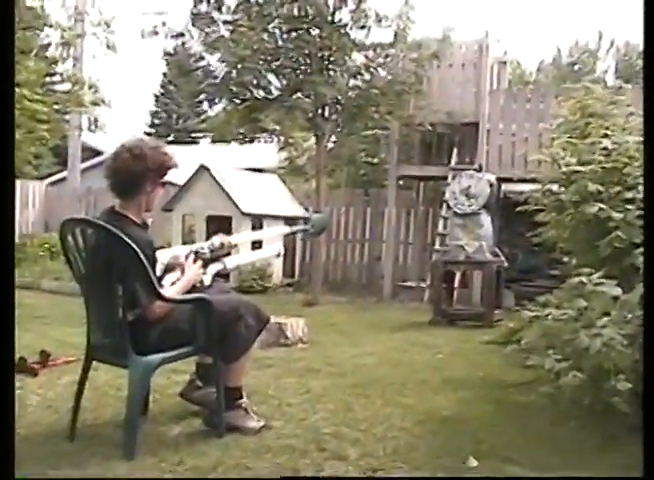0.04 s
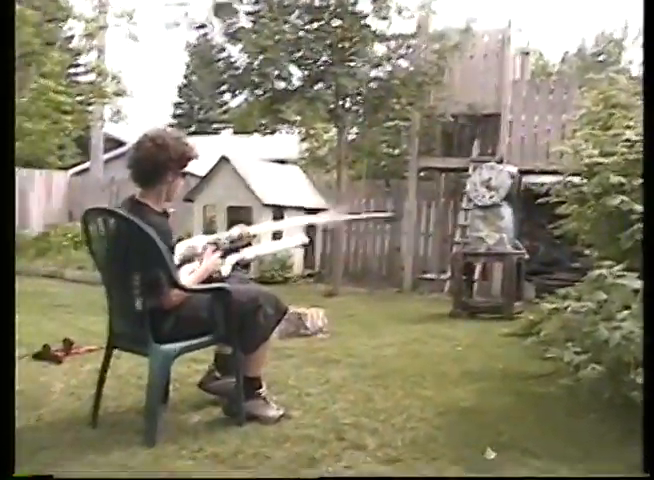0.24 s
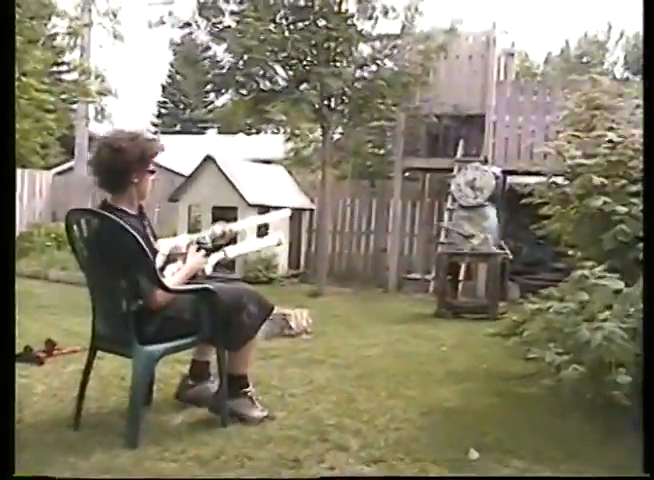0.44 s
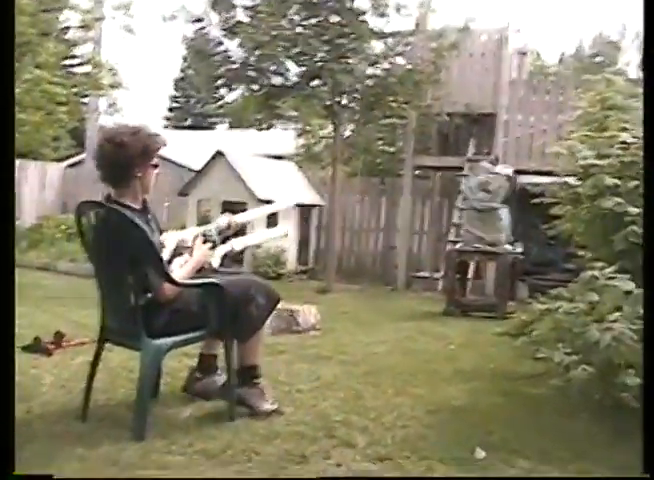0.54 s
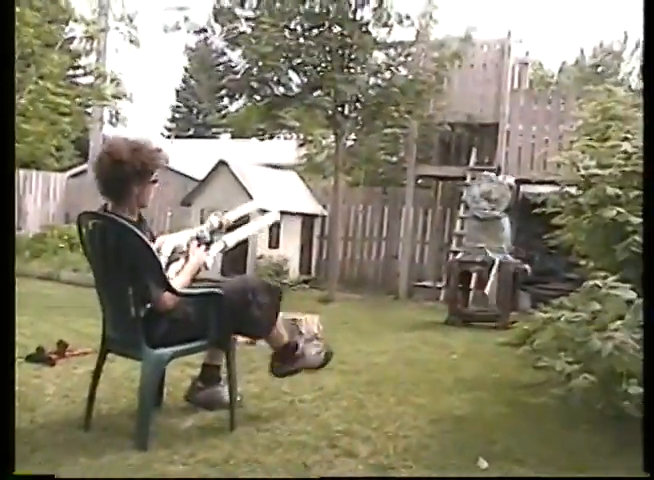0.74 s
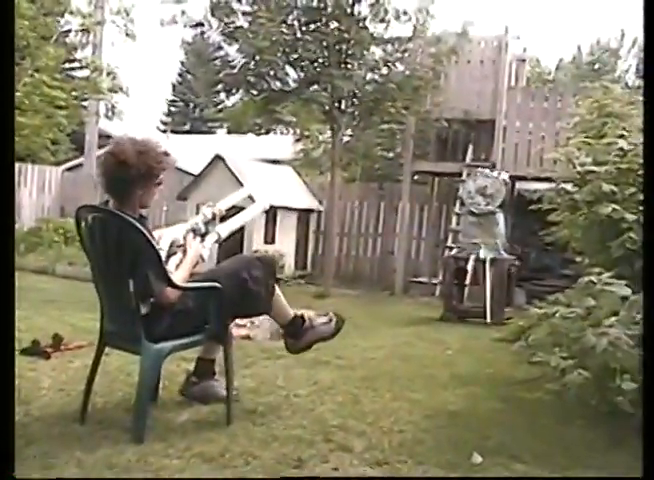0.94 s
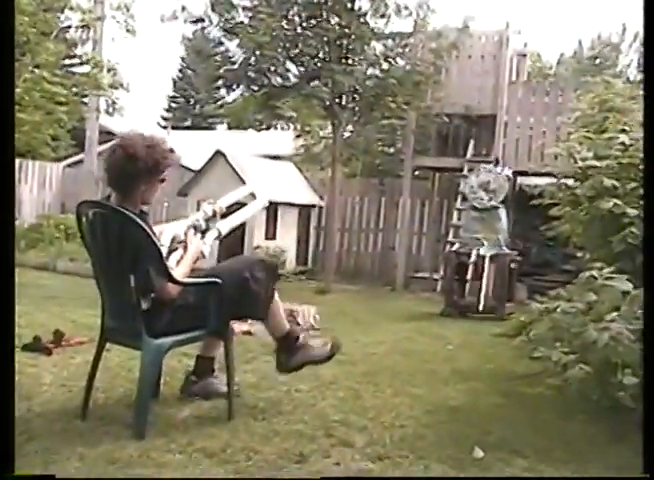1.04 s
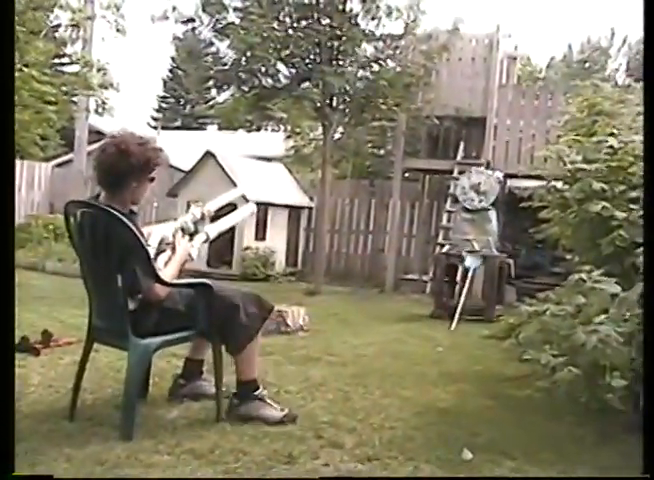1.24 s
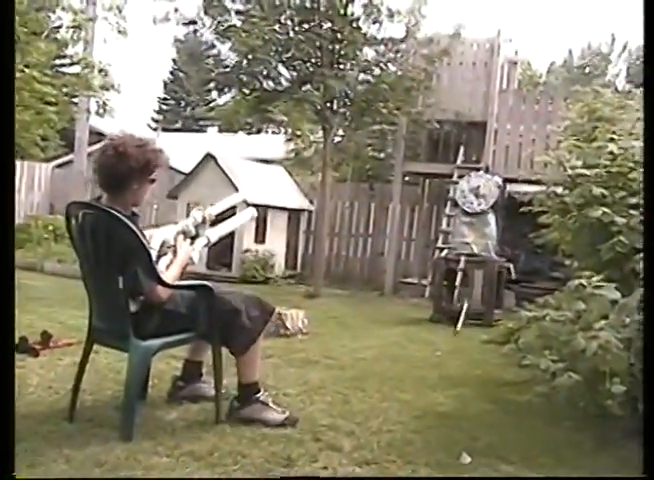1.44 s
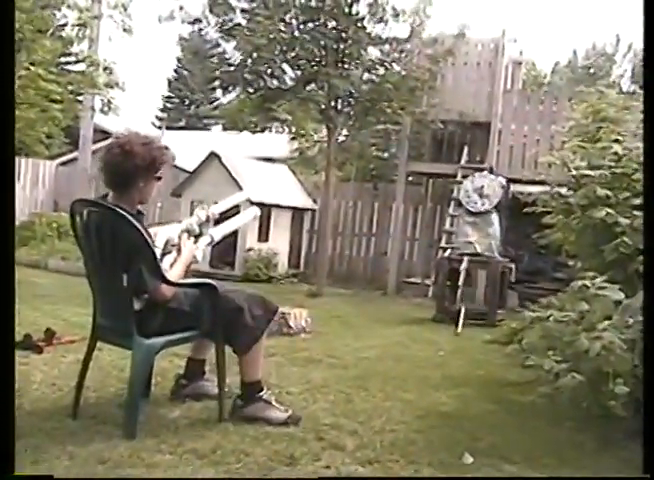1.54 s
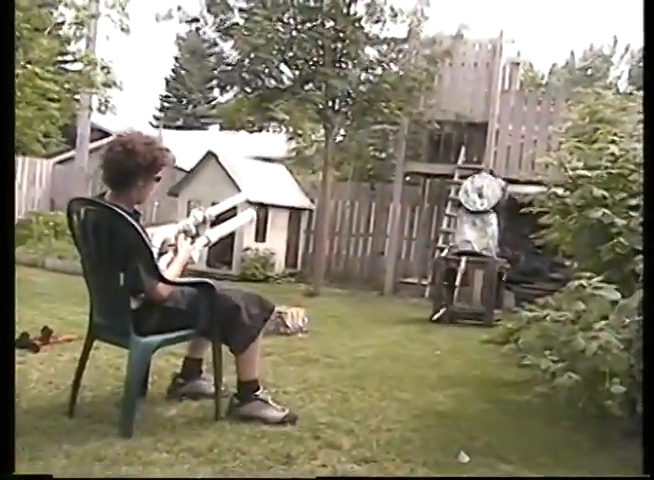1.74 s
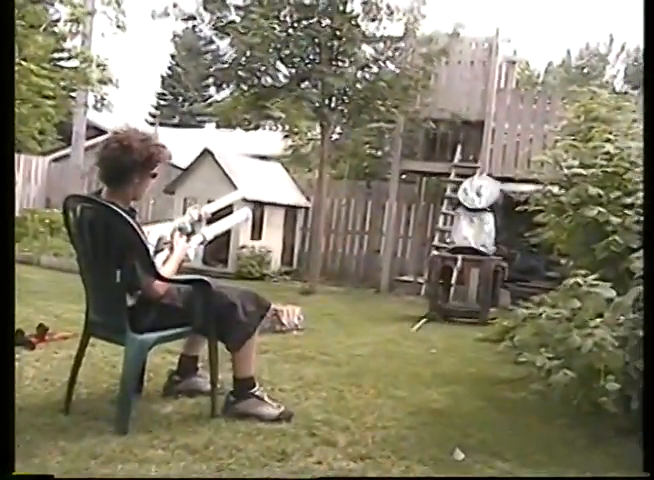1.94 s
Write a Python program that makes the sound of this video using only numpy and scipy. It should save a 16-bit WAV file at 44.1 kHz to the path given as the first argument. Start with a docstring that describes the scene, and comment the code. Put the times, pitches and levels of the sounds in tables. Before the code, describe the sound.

A homemade air cannon clicks, pops and hisses in a backyard. Its shot crashes into a hollow, booming target; loose pieces clink and scrape, and one lands with a clack. A camcorder microphone catches it on the left only.

```python
"""In a backyard, a homemade air cannon fires: the trigger clicks, the valve pops, the tank hisses empty.
The shot crashes into a hollow target that booms and shudders. Loose pieces clink, knock and scrape,
and one falls with a hard clack. Fence and sheds throw the sound back to a camcorder that turns
the loudest moments down and has sound on the left only, with faint hiss on the right."""
import sys
import numpy as np
from scipy import signal
from scipy.fft import rfft, irfft
from scipy.io import wavfile
from scipy.ndimage import uniform_filter1d

SR = 44100
rng = np.random.default_rng(int(sys.argv[2]) if len(sys.argv) > 2 else 0)


def transcribe(signal):
    """Save signal, clipped to [-1, 1], as a 16-bit WAV file at the path in sys.argv[1]."""
    frames = np.atleast_2d(signal).T
    limited = np.clip(frames, -1, 1)
    pcm = np.round(limited * 32767).astype(np.int16)
    wavfile.write(sys.argv[1], SR, pcm)


N = 88200
T = np.arange(N) / SR


def amp(db):
    """Turns decibels into a number to multiply by."""
    return 10 ** (np.asarray(db) / 20)


def look_up(points, hz):
    """Reads a table at any pitch, blending between its rows."""
    pitches, values = np.transpose(points)
    return np.interp(np.log(hz + 1), np.log(pitches + 1), values)


def evened(x):
    """Scales a signal to an average power of 1."""
    return x / np.sqrt(np.mean(x ** 2) + 1e-20)


def noise(colour):
    """Noise of power 1; its colour says how strong each pitch is next to the others."""
    gain = amp(look_up(colour, np.fft.rfftfreq(N, 1 / SR)))
    return evened(irfft(rfft(rng.standard_normal(N)) * gain, N))


def since(start):
    """Seconds since start, zero before it."""
    return np.maximum(T - start, 0)


def dying(start, ring_s):
    """Jumps to 1 at start, then fades by 60 dB in ring_s seconds."""
    return (T >= start) * np.exp(-np.log(1000) * np.minimum(since(start) / max(ring_s, 1e-4), 10))


def rise(start, rise_s):
    """Climbs smoothly from 0 towards 1."""
    return 1 - np.exp(-since(start) / rise_s)


def swell(start, rise_s, hold_s, fall_db_per_s):
    """Rises, holds, then fades away."""
    return rise(start, rise_s) * amp(-np.minimum(fall_db_per_s * since(start + hold_s), 200))


def ring(start, tones, ratio=1):
    """The fading tones of a struck object; ratio scales their pitch."""
    return sum(amp(db) * dying(start, ring_s) * np.sin(2 * np.pi * hz * ratio * since(start)) * (-1) ** k
               for k, (hz, db, ring_s) in enumerate(tones))


def grains(depth_db, samples):
    """A random flutter in loudness that makes noise sound rough."""
    return evened(amp(depth_db * evened(uniform_filter1d(rng.standard_normal(N), size=samples))))


def yard(sound, tail_db):
    """Adds echoes from ground and fence, and a blurred tail whose highest pitches die first."""
    # single echoes: delay_s, level_db
    echoes = [(.0043, -27), (.0095, -17), (0.0227, -15.5), (.028, -22.5)]
    # how long the tail lasts: pitch_hz, ring_s
    ring_times = [(100, 0.44), (400, 0.28), (1200, 0.73), (3000, 0.44), (6000, 0.3), (12000, 0.21)]
    hz, t, spectrum = signal.stft(rng.standard_normal(SR), SR, nperseg=256)
    fade = amp(-60 * t / look_up(ring_times, hz)[:, None])
    tail = signal.istft(spectrum * fade, SR, nperseg=256)[1][:SR]
    response = amp(tail_db) * evened(tail * rise(0, 0.015)[:SR]) / np.sqrt(SR)
    for delay, db in echoes:
        response[round(delay * SR)] += amp(db)
    return sound + signal.fftconvolve(sound, response)[:N]


def outdoor_air():
    """Steady outdoor air and camcorder hiss."""
    # background noise: pitch_hz, level_db
    colour = [(18, -35), (30, -2), (179, 4.5), (449, -6), (486, -4), (1010, -10.5), (2010, -5), (2680, -16),
              (4780, -13), (5310, -8), (7870, -13), (8520, -21.5), (16000, -23.5)]
    return amp(-51.5) * noise(colour)


def trigger():
    """Trigger and valve click, and the plastic gun rings."""
    # clicks: start_s, level_db, ring_s
    clicks = [(0.187, -18.5, 0.019), (0.2294, -20.5, 0.019)]
    # click noise: pitch_hz, level_db
    colour = [(60, -18), (400, -15), (1500, 1.5), (2800, -5), (4500, -5), (7500, -0.5), (10500, -16),
              (16000, -20)]
    # the gun's tones: pitch_hz, level_db, ring_s
    tones = [(126, -17, 0.036), (2520, -16, 0.08), (3273, -18.5, 0.18)]
    return sum(amp(db) * (noise(colour) * dying(s, ring_s) + ring(s, tones)) for s, db, ring_s in clicks)


def valve_pops():
    """Air pops out as the valve opens and the shot leaves the barrel."""
    # pops: start_s, level_db, hold_s
    pops = [(.2328, -12.5, 0.00067), (0.2374, -10.5, 0.00088), (.239, -8.5, 0.0026)]
    # pop noise: pitch_hz, level_db
    colour = [(30, -2), (200, 1), (500, -7.5), (850, 4), (1600, -4.5), (3500, -9), (7000, -2), (11000, -15),
              (16000, -27)]
    return noise(colour) * sum(amp(db) * swell(s, .0003, hold, 3300) for s, db, hold in pops)


def air_jet():
    """Swirling air hisses and whistles out of the tank; the barrel roars while pressure is high."""
    # hiss: pitch_hz, level_db
    hiss_colour = [(30, -13), (110, -3.5), (200, -13), (400, -10), (900, -14.5), (1600, -1.5), (2500, 0.5),
                   (3600, 1), (5100, 3), (7200, -0.5), (8500, -5.5), (10500, -13), (13000, -25),
                   (16000, -43)]
    # whistles: pitch_hz, width_hz, level_db
    tones = [(2481, 20, -31), (2597, 20, -30), (4950, 28, -30), (5218, 20, -31), (5400, 20, -33),
             (6240, 20, -31), (6815, 20, -31), (7232, 20, -32)]
    # roar: pitch_hz, level_db
    roar_colour = [(40, -22), (200, -9), (400, -13), (700, 2.5), (1300, -8), (2200, -2), (4000, -27),
                   (16000, -46)]
    hz = np.fft.rfftfreq(N, 1 / SR)
    swirl = rfft(rng.standard_normal(N))
    whistles = sum(amp(db) * evened(irfft(swirl / (1 + 1j * (hz - pitch) / width) ** 2, N))
                   for pitch, width, db in tones)
    peak_s, width_s = 0.28, 0.035
    roar = amp(-23) * noise(roar_colour) * np.exp(-.5 * ((T - peak_s) / width_s) ** 2)
    hiss = amp(-14) * noise(hiss_colour)
    return (hiss + whistles + roar) * swell(0.24, rise_s=0.0059, hold_s=0.19, fall_db_per_s=280)


def crash():
    """The shot cracks into the target and crunches through it in uneven blows."""
    # first crack: pitch_hz, level_db
    crack_colour = [(30, 0), (350, 0), (850, 4), (1600, -13), (3200, -7), (6000, -14), (10000, -16),
                    (16000, -25)]
    # crunch: pitch_hz, level_db
    crunch_colour = [(30, -12), (70, -2), (180, 8), (300, 4.5), (520, -1), (1050, 4), (1500, -1.5),
                     (2600, 1.5), (3800, -4.5), (5500, -3), (7500, -9.5), (10000, -23.5), (16000, -48)]
    # further blows: start_s, level_db, ring_s
    blows = [(.5612, -26, 0.038), (0.579, -9.5, 0.071), (0.596, -7, 0.044), (0.624, -11, 0.042)]
    start_s, sag_db_per_s = .558, 50
    force = swell(start_s, rise_s=0.011, hold_s=0.07, fall_db_per_s=157)
    force *= amp(-8.5 - sag_db_per_s * since(start_s)) * grains(depth_db=-1, samples=110)
    power = force ** 2 + sum((amp(db) * dying(s, ring_s)) ** 2 for s, db, ring_s in blows)
    crack = amp(-3) * noise(crack_colour) * dying(start_s, ring_s=.016)
    return crack + noise(crunch_colour) * np.sqrt(power)


def hollow_target():
    """The target booms at each heavy blow and pushes the air once as it gives way."""
    # booms: start_s, level_db, pitch_ratio
    hits = [(0.564, -8, 1.05), (0.625, -10.5, 1.033), (.684, -19, 1), (0.845, -32.5, 1.08),
            (1.591, -24.5, 1.08), (1.894, -34, 1.59)]
    # the target's tones: pitch_hz, level_db, ring_s
    tones = [(99.24, -1.5, 0.46), (131.9, 1, 0.39), (191.4, -17, 0.43)]
    booms = sum(amp(db) * ring(s, tones, ratio) * rise(s, .012) for s, db, ratio in hits)
    push_s, push_hz = .672, 40
    cycles = (T - push_s) * push_hz
    push = amp(-22) * np.sin(2 * np.pi * cycles) * np.exp(-(2 * cycles) ** 2)
    return booms + push


def rocking_stand():
    """The target's stand shudders as it rocks."""
    # shudders: start_s, level_db, hold_s, fade_db_per_s
    shudders = [(0.569, -24.5, 0.78, 25.5), (1.508, -43, 0.019, 35), (1.59, -31.5, 0.21, 68),
                (1.9, -40.5, .15, 47)]
    # rumble: pitch_hz, level_db
    colour = [(30, -19), (65, -38), (100, -7), (130, 4), (165, -7), (210, -5.5), (290, -17.5), (420, -15.5),
              (600, -31), (1000, -23), (2500, -29), (8000, -41.5), (16000, -76)]
    return noise(colour) * sum(amp(db - fade * since(s)) * swell(s, 0.0058, hold, fall_db_per_s=118)
                               for s, db, hold, fade in shudders)


def metal_clinks():
    """A small metal part ticks and rings at each hit; its long note stops as it comes to rest."""
    # hits: start_s, bright_db, note_db, tick_db
    hits = [(.6665, -18, -37, -15.5), (.731, -40, -39, -39), (.837, -47, -60, -36),
            (.9815, -31.5, -42, -31.5), (1.027, -47, -52, -40), (1.219, -54, -49.5, -41.5)]
    # bright tones: pitch_hz, level_db, ring_s
    bright = [(3970, -21, 0.035), (6530, -23, 0.18), (7580, -9, 0.081), (8320, -5.5, 0.13),
              (8480, -12, 0.16), (9240, -15, .08), (10840, -19, 0.043)]
    # long note: pitch_hz, level_db, ring_s
    note = [(2783, 0, .7)]
    # contact tick: pitch_hz, level_db
    colour = [(60, -26), (2000, 1), (4000, -2), (5600, 2), (8300, 0.5), (10000, -10), (13000, -18),
              (16000, -27)]
    contact = noise(colour)
    rest_s, rest_db_per_s = 1.25, 300
    damping = amp(-rest_db_per_s * since(rest_s))
    return sum(amp(bright_db) * ring(s, bright)
               + amp(note_db) * damping * ring(s, note)
               + amp(tick_db) * contact * dying(s, ring_s=0.044)
               for s, bright_db, note_db, tick_db in hits)


def loose_knocks():
    """Loose pieces knock, each a burst of noise around its own pitch."""
    # knocks: start_s, level_db, ring_s, pitch_hz
    knocks = [(0.7285, -16, 0.044, 2970), (0.736, -24.5, 0.042, 1030), (0.836, -29.5, 0.096, 960),
              (.844, -20.5, .045, 1220), (.959, -29.5, 0.092, 914.4), (0.982, -34, 0.14, 1400),
              (1.0084, -31, 0.026, 4200), (1.025, -29, 0.037, 3240), (1.079, -38, 0.023, 1180),
              (1.219, -31.5, 0.039, 870), (1.2198, -34, 0.033, 2300), (1.26, -43, 0.031, 700),
              (1.276, -39, 0.065, 5040), (1.288, -38.5, 0.067, 4900)]
    # knock noise: pitch_ratio, level_db
    colour = [(.05, -7), (.5, -6.5), (.8, 0), (1, 2.5), (1.25, -3.5), (1.7, -5.5), (2.5, -20.5), (4, -36),
              (14, -57)]
    sound = np.zeros(N)
    for s, db, ring_s, hz in knocks:
        burst = noise([(ratio * hz, level) for ratio, level in colour])
        sound += amp(db) * burst * swell(s, rise_s=0.00078, hold_s=0, fall_db_per_s=60 / ring_s)
    return sound


def settling_ticks():
    """Small parts tick lightly as they settle."""
    # ticks: start_s, level_db, ring_s
    ticks = [(0.959, -37, 0.046), (1.078, -41.5, 0.03), (1.5099, -25.5, 0.0077), (1.713, -30, 0.016),
             (1.8932, -33.5, 0.02), (1.9086, -35.5, 0.016)]
    # tick noise: pitch_hz, level_db
    colour = [(60, -22), (1000, -18), (2200, -11), (3300, 4), (5600, 10.5), (8000, -4.5), (11000, -21),
              (16000, -22)]
    return noise(colour) * sum(amp(db) * dying(s, ring_s) for s, db, ring_s in ticks)


def scrape():
    """A piece scrapes and rattles down the target."""
    # scraping noise: pitch_hz, level_db
    colour = [(40, -15), (170, -19), (240, 3), (310, 0.5), (400, 3.5), (580, -13.5), (900, -2), (1500, -26),
              (3000, -21.5), (7000, -23), (11000, -37), (16000, -64)]
    start_s, sag_db_per_s = 0.98, 17.5
    slide = swell(start_s, rise_s=0.0075, hold_s=0.327, fall_db_per_s=270)
    slide *= amp(-40.5 - sag_db_per_s * since(start_s))
    return slide * grains(depth_db=3.5, samples=250) * noise(colour)


def falling_piece():
    """A piece lands and bounces with a clack that echoes; a few metallic tones ring on."""
    # landing and bounce: start_s, level_db
    hits = [(1.5721, -12), (1.594, -20.5)]
    # clack noise: pitch_hz, level_db
    colour = [(40, -15), (300, -26), (390, 3), (480, 4.5), (590, -3), (740, 2.5), (900, -0.5), (1150, -4.5),
              (1800, -4), (2500, 0.5), (3900, -6.5), (5500, -5.5), (7500, -14), (10000, -25.5),
              (16000, -43)]
    # short tones: pitch_hz, level_db, ring_s
    short_tones = [(480, -26, 0.098), (738.6, -7, 0.15), (2000, -38, .15), (2272, -13, .14),
                   (2525, -1.5, 0.07), (2640, -22.5, 0.34), (3350, -5.5, 0.13), (4730, -10.5, 0.17),
                   (5790, 0, 0.033), (8400, -14, 0.049)]
    # lasting tones: pitch_hz, level_db, ring_s
    long_tones = [(904, -38, 1), (1028, -31.5, .8), (1292, -24.5, .6)]
    clack = sum(amp(db) * (noise(colour) * dying(s, 0.15) + ring(s, short_tones)) * rise(s, 0.0013)
                for s, db in hits)
    return yard(clack, tail_db=-15.5) + ring(hits[0][0], long_tones)


def scene():
    """Cannon, target and yard on the left; faint hiss on the right."""
    cannon = yard(trigger() + valve_pops() + air_jet(), tail_db=-8.5)
    breakage = yard(crash() + loose_knocks() + metal_clinks() + settling_ticks() + scrape(), tail_db=-13.5)
    left = cannon + breakage + falling_piece() + hollow_target() + rocking_stand() + outdoor_air()
    right = amp(-77.5) * noise([(30, 7), (300, 8), (3000, -5), (16000, -1)])
    return np.array([left, right])


def record(dry):
    """The camcorder turns loud moments down, rounds off the peaks and cuts the highest pitches."""
    limit_db, cut_share, recover_db_per_s = -11.5, 0.53, 95
    ceiling, top_hz = .95, 16300
    power_db = 10 * np.log10(abs(uniform_filter1d(dry[0] ** 2, size=200)) + 1e-12)
    fall = T * recover_db_per_s
    peak_db = np.maximum.accumulate(power_db + fall) - fall  # jumps up at once, sinks slowly
    over_db = np.maximum(peak_db - limit_db, 0)
    held = dry * amp(-cut_share * uniform_filter1d(over_db, size=100))
    rounded = ceiling * np.tanh(held / ceiling)
    lowpass = signal.firwin(255, top_hz, window=("kaiser", 9), fs=SR)
    return signal.oaconvolve(rounded, lowpass[None], "same")


dry = scene()
out = record(dry)
transcribe(out)
```